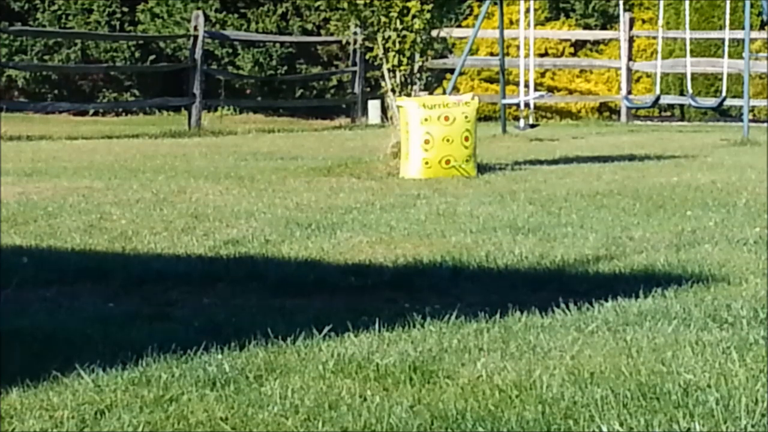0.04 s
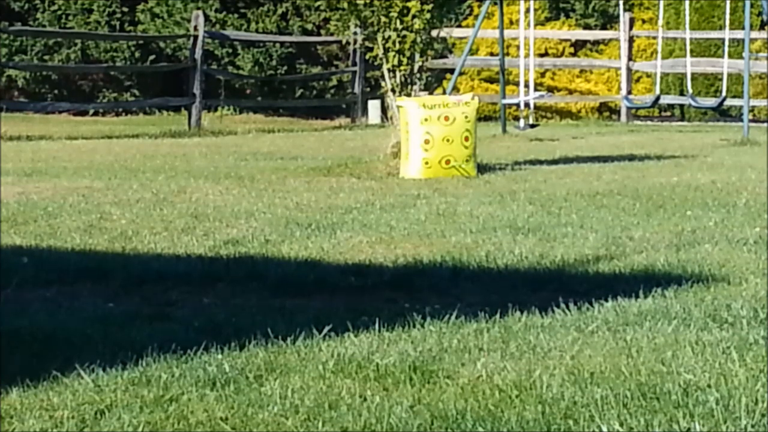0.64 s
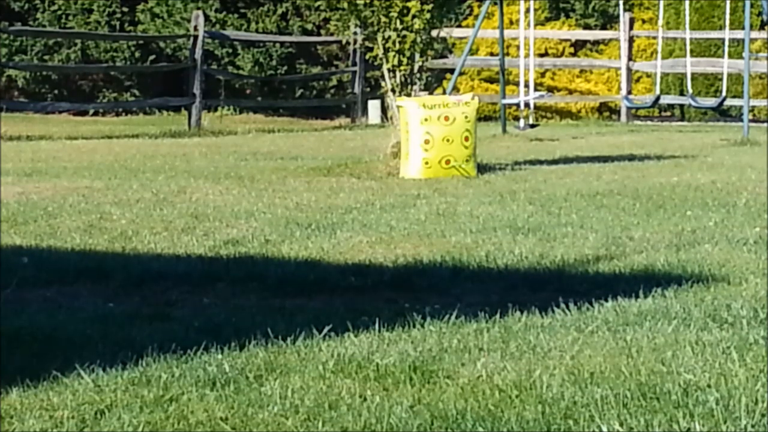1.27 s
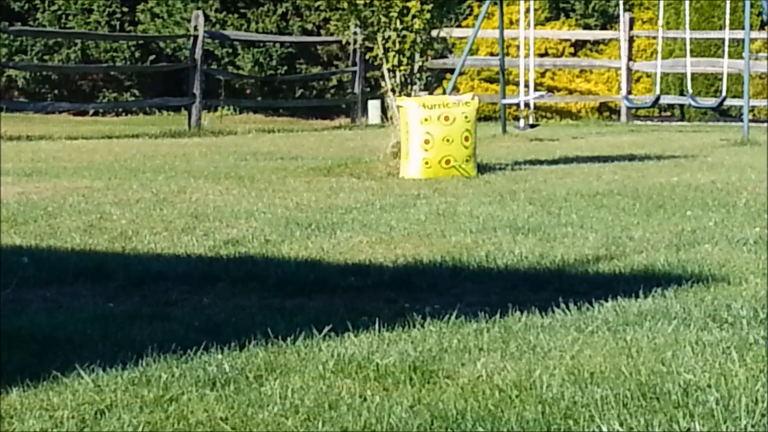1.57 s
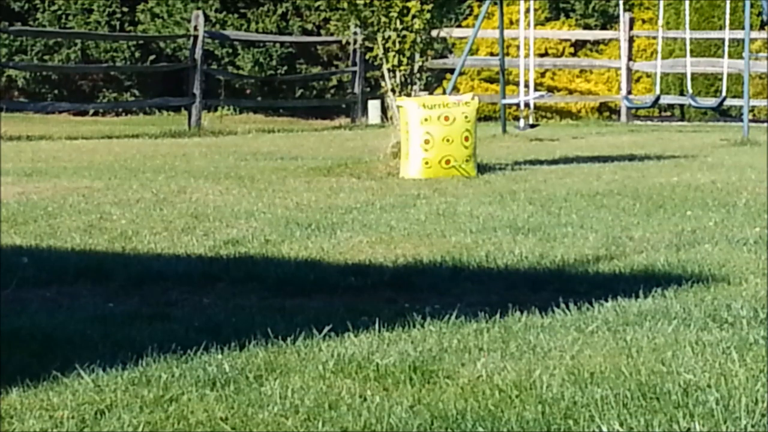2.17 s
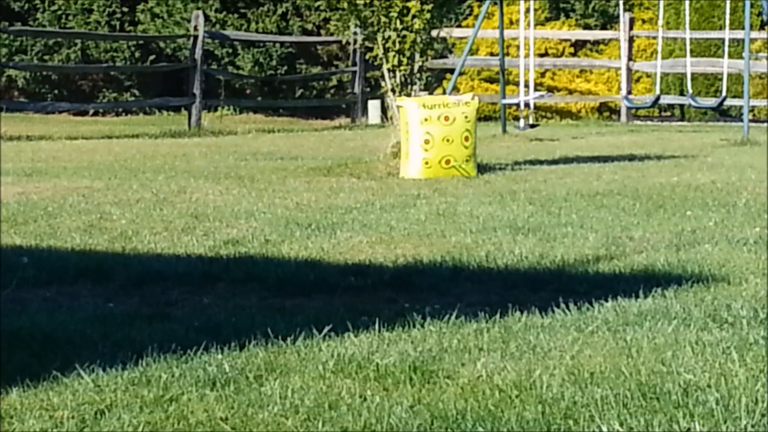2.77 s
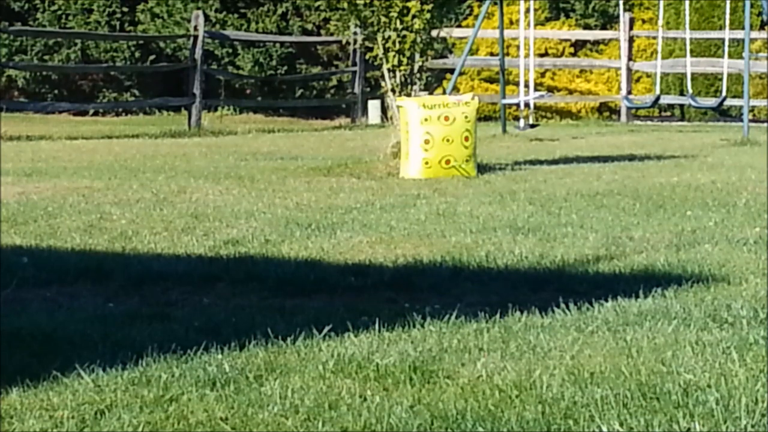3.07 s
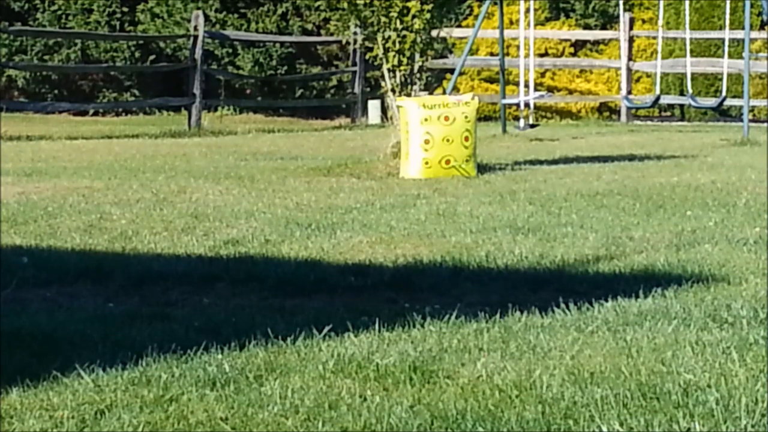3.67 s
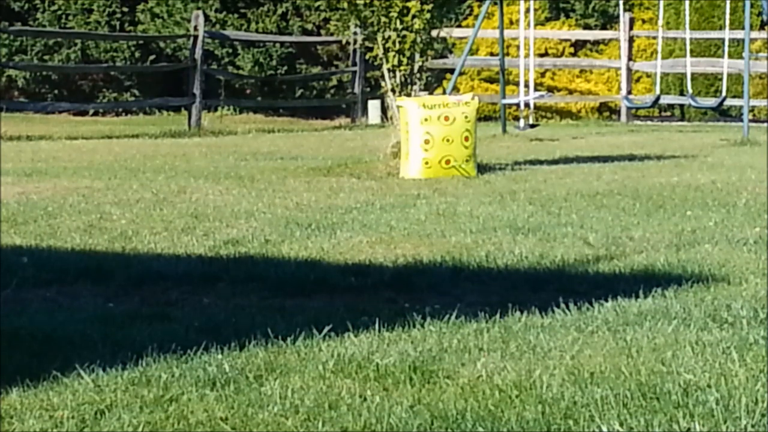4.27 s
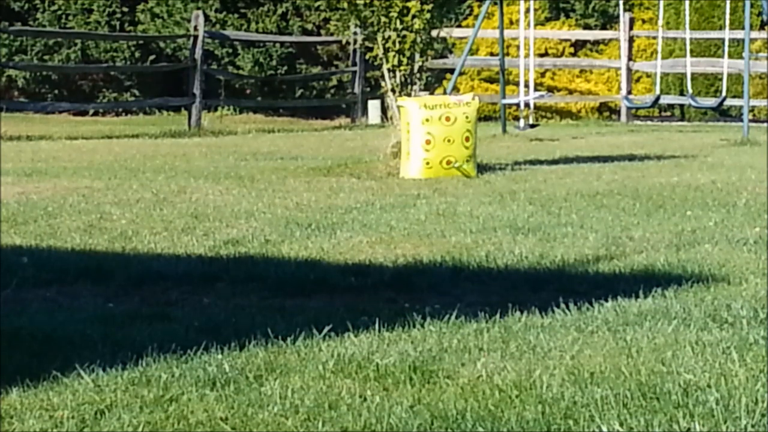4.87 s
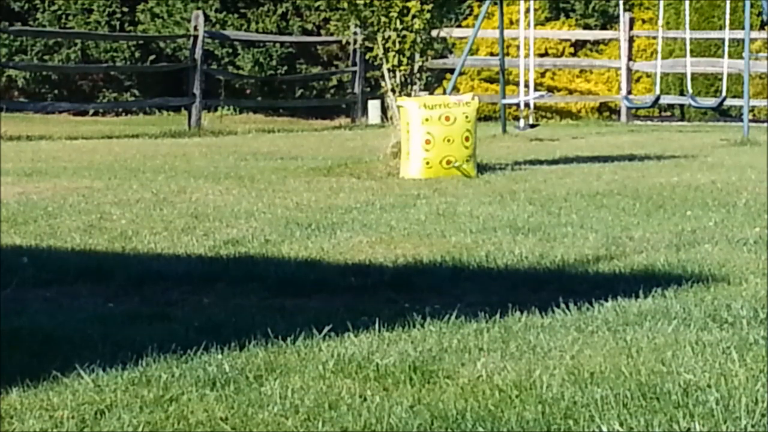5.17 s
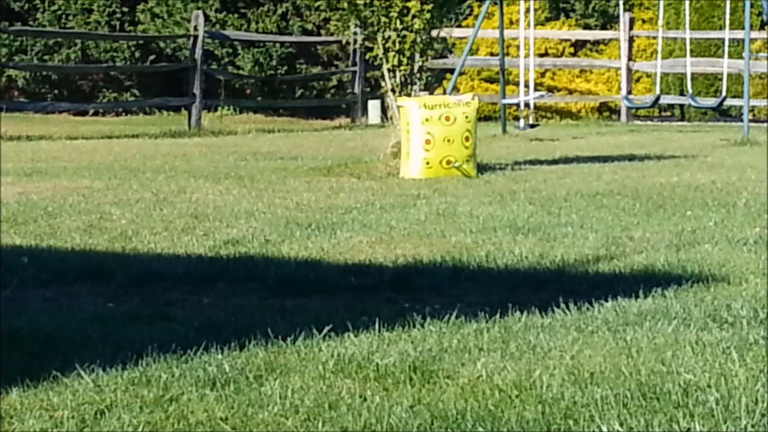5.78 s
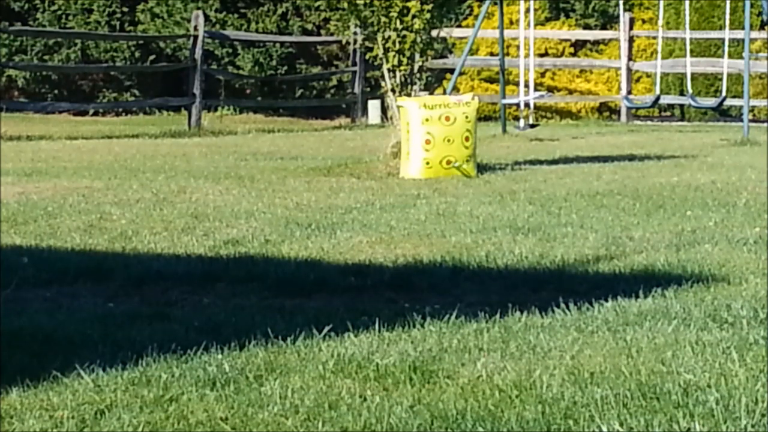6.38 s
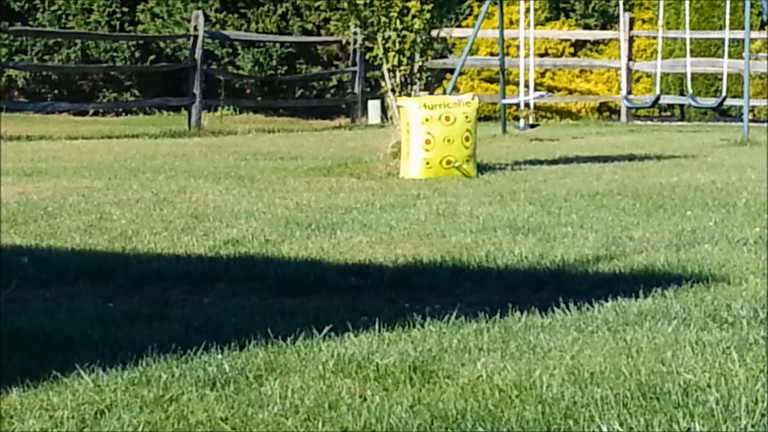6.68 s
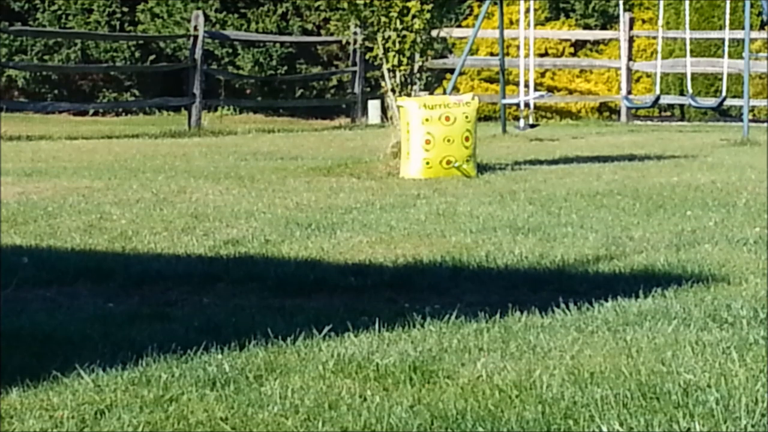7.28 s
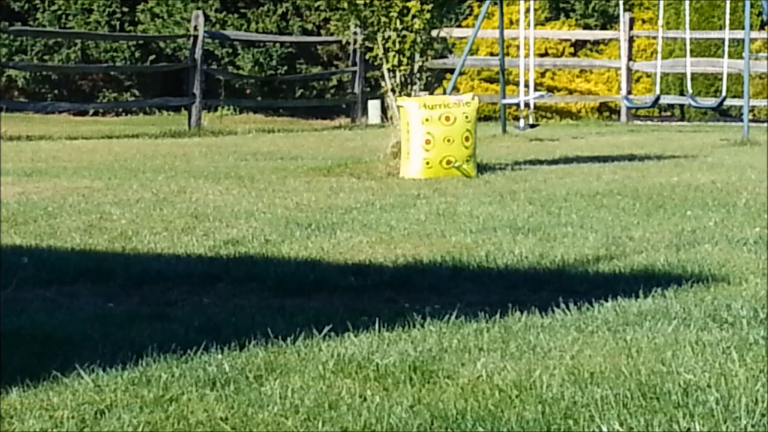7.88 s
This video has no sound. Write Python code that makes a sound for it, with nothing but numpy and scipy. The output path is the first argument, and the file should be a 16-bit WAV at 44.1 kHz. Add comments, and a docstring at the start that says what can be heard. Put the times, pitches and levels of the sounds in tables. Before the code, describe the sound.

A faint, high chorus of crickets trills throughout, swelling and dipping over a soft outdoor hiss and a very faint distant traffic rumble. Fingers lightly touch a crossbow in the first half second. From about 2.3 seconds, gusts buffet the microphone with low, uneven thumps. At 4.3 seconds the crossbow fires close by: one loud, sharp crack with a hollow thump and a brief metallic ring, slightly overloading the microphone. At 4.5 seconds the bolt hits a bag target straight ahead with a bright slap and a tiny rattle. Both sounds echo round the yard, fading within about half a second. The wind eases after 5 seconds. The bow gives a small click at 5.7 seconds and a soft, hollow knock at 5.9. From 6.3 seconds until the end, around 8 seconds, sleeves rustle faintly in short strokes, slightly to the right, as the crickets continue.

```python
"""Crickets trill all round a lawn while wind buffets the microphone. About four seconds in, a crossbow
fires: the latch lets go and the string slams home, loud enough to overload the microphone.
A fifth of a second later the bolt slaps into a bag target, and fence and house throw both sounds back.
Then the shooter lowers the bow with a knock and rustling sleeves."""
import sys
import numpy as np
from scipy import signal
from scipy.fft import rfft, irfft, next_fast_len
from scipy.io import wavfile
from scipy.ndimage import uniform_filter1d, map_coordinates

SR = 44100
rng = np.random.default_rng(int(sys.argv[2]) if len(sys.argv) > 2 else 0)


def dump_mix(stems):
    """Bounce the given channels to the path in sys.argv[1] as a 16-bit WAV at rate SR."""
    frames = np.atleast_2d(stems).T  # one column per channel
    limited = np.clip(frames, -1, 1)  # hard clip at full scale
    pcm = np.round(limited * 32767).astype(np.int16)
    wavfile.write(sys.argv[1], SR, pcm)


N = 358974
TIME = np.arange(N) / SR
# In the tables, fade_s is the time to fade by 60 dB and left_db is how much louder the left side is.

# The blows of the shot (latch, bolt on the rail, string stop, cams, rebound, rattle, echo off a wall):
# start_s, crack_db, boom_db, ring_db, rise_s, fade_s, left_db
SHOT_BLOWS = [(4.3186, -7.5, -22, -39.5, .0015, .022, 0.5), (4.3222, -19.5, -36, -44.5, .003, 0.038, -5.5),
              (4.327, -1.5, -2, -22.5, .002, 0.046, 1.5), (4.332, -1, -29.5, -27.5, 0.0037, 0.023, -1),
              (4.3491, -12, -17.5, -30, .001, .048, 0.5), (4.3702, -28.5, -31, -43, .001, 0.08, -3.5),
              (4.416, -27, -30, -48.5, 0.016, 0.035, 1)]
# Tone of a blow's sharp crack: pitch_hz, level_db
CRACK_TONE = [(700, -20), (1200, -6.5), (1700, -11), (2300, -7.5), (3100, -15), (4000, -6), (5100, -1),
              (6200, -4), (7600, 0.5), (9200, -13.5), (14500, -21)]
# Tone of the air pushed by the limbs, the bow's springy arms: pitch_hz, level_db
BOOM_TONE = [(60, -28), (200, -22), (300, 11), (430, 10.5), (760, -7), (900, -5.5), (1300, -12.5),
             (2000, -27.5)]
# Deep notes of the limbs: pitch_hz, level_db, fade_s
LIMB_NOTES = [(307, -13, 0.16), (407, -6.5, 0.039), (426, -4.5, 0.085), (449, -17.5, 0.1), (590, 0, 0.041),
              (642, -17.5, .12), (705, -6, 0.073), (788, -8, 0.056), (937, -12, .05), (1002, -11, 0.055),
              (1218, -7.5, .06)]
# High notes of the rail, cams and fittings: pitch_hz, level_db, fade_s
METAL_NOTES = [(1642, -2, 0.083), (2070, -8.5, 0.1), (2181, -11, .1), (2322, -8.5, 0.083),
               (2988, -8.5, 0.12), (4100, -16.5, .2), (4850, -9, 0.134), (5400, 4, 0.045),
               (5083, -7.5, .15), (5630, -3, 0.11), (6636, -1, .13), (7349, -3, .1), (7500, 2, 0.1292),
               (8300, -3, .12), (7815, -5, 0.1215), (11430, -14.5, .1)]


def crossbow():
    """Each blow cracks, pushes air with the limbs and leaves the metal ringing."""
    out = np.zeros((2, N))
    bass_cut = signal.butter(4, 290, "high", fs=SR, output="sos")  # thin limbs give off little bass
    for start_s, crack_db, boom_db, ring_db, rise_s, fade_s, left_db in SHOT_BLOWS:
        crack = amp(crack_db) * burst(CRACK_TONE, 0.18, rise_s, fade_s)
        limbs = signal.sosfilt(bass_cut, ringing(LIMB_NOTES, rise_s / 2, looseness=0))
        pushed_air = amp(-5.5) * burst(BOOM_TONE, 0.83, rise_s, fade_s)
        boom = amp(boom_db) * pan(3) * (limbs + pushed_air)
        metal = amp(ring_db) * ringing(METAL_NOTES, rise_s, looseness=1)
        add(out, start_s, pan(left_db) * (crack + boom + metal))
    return from_right(out)


# The bag gives, the shaft rattles, the fence echoes: start_s, rattle_db, thud_db, rise_s, fade_s, left_db
BAG_KNOCKS = [(4.5138, -5, -25.5, 0.00014, 0.0042, 0), (4.519, -50, -30, 0.00075, 0.032, -4),
              (4.528, -35, -38, .0005, 0.034, 3), (4.5332, -14, -39, 0.00045, 0.011, 11.5),
              (4.5425, -16, -29, 0.0018, 0.028, 4.5), (4.556, -27.5, -53, 0.008, 0.061, 0),
              (4.5945, -20, -41, 0.0016, 0.044, 3.5)]
# Bright tone of the bag's tight cloth: pitch_hz, level_db
CLOTH_TONE = [(150, -15), (450, -10), (900, -9.5), (1900, -2.5), (4000, 1), (5000, 7.5), (6300, -0.5),
              (7400, 3.5), (8300, -7.5), (10200, -30), (14500, -34)]
# Dull tone of the bag's filling: pitch_hz, level_db
FILLING_TONE = [(40, -26), (120, -1), (250, 2.5), (420, -1), (650, -24), (1200, -24)]


def target():
    """The bolt's point slaps the tight bag straight ahead, then the bag and the shaft settle."""
    slap_s, slap_db, size = 4.5126, 0.3, 2048
    cloth = tone_gain(CLOTH_TONE, np.fft.rfftfreq(size, 1 / SR))
    # Pack the cloth's whole tone into one pulse that starts at once (a minimum-phase pulse).
    cepstrum = irfft(np.log(cloth + 1e-4))
    slap = irfft(np.exp(rfft(2 * cepstrum[:size // 2], size)))
    out = knocks(BAG_KNOCKS, CLOTH_TONE, FILLING_TONE)
    add(out, slap_s, amp(slap_db) * slap / np.abs(slap).max())
    return out


# How long sound lingers among nearby surfaces: pitch_hz, fade_s
NEAR_FADES = [(150, .25), (600, 0.069), (2000, 0.28), (7000, 0.17), (12000, .14)]
# How long it lingers across the whole yard: pitch_hz, fade_s
YARD_FADES = [(150, 1.3), (600, 0.2), (2000, 1.6), (5500, 1.4), (8000, 0.58), (12000, 0.34)]


def reflections(sound, fades, build_s, reach_s):
    """Many small echoes build up, fade at each pitch's own speed and stop where the yard ends."""
    hz, t, bands = signal.stft(rng.standard_normal((2, SR)), SR, nperseg=256)
    fading = amp(-60 * t / value_at(fades, hz)[:, None])
    walls = (1 - np.exp(-t / build_s)) / (1 + (t / reach_s) ** 8)
    tail = signal.istft(bands * fading * walls, SR, nperseg=256)[1]
    return signal.fftconvolve(sound, tail / np.linalg.norm(tail[0]), axes=1)[:, :N]


# Echoes off hedges and houses farther away: start_s, level_db, pitch_hz, rise_s, fade_s
FAR_ECHOES = [(4.625, -41, 930, 0.0061, 0.11), (4.665, -42, 1480, 0.014, 0.22),
              (4.793, -49, 2390, 0.016, 0.23), (4.835, -47, 2760, 0.0053, 0.086)]


def echoes():
    """Each far surface returns the shot as a smear, played here as a burst of noise around one pitch."""
    out = np.zeros((2, N))
    for start_s, level_db, hz, rise_s, fade_s in FAR_ECHOES:
        band = [(hz / 2, -18), (hz, 0), (hz * 2, -18)]
        add(out, start_s, amp(level_db) * burst(band, 0.28, rise_s, fade_s))
    return out


# Fingers touching the bow: start_s, click_db, bump_db, rise_s, fade_s, left_db
FINGER_KNOCKS = [(.18, -53, -80, 0.02, 0.08, 4), (.305, -77, -52, 0.013, .1, 1),
                 (.365, -51.5, -69, 0.03, 0.18, 3), (5.6915, -43, -55, 0.00071, 0.18, 0.5),
                 (5.886, -47.5, -38, 0.0025, 0.13, 4.5), (5.908, -58, -40, 0.0018, 0.089, 0)]
# Tone of a finger's bright click: pitch_hz, level_db
CLICK_TONE = [(300, -10), (900, -3), (2000, -6.5), (4200, 2), (7000, 2), (12000, -30)]
# Tone of the dull bump under it: pitch_hz, level_db
BUMP_TONE = [(30, -9), (90, -7), (170, -6.5), (235, -2.5), (320, -9), (450, -14), (800, -16.5), (1100, -25),
             (1900, -17), (4000, -61)]
# Notes of a loose fitting: pitch_hz, level_db, fade_s
FITTING_NOTES = [(2860, -5, .05), (3900, 1, 0.045), (4370, 2, .05)]
# Notes of the stock, the bow's hollow body: pitch_hz, level_db, fade_s
STOCK_NOTES = [(166, -13, 0.069), (247, -1, 0.2), (430, -7, 0.055)]


def handling():
    """Fingers knock on the bow, a fitting ticks as the grip shifts, and a bump rings the stock."""
    tick_s, bump_s = 5.692, 5.888
    out = knocks(FINGER_KNOCKS, CLICK_TONE, BUMP_TONE)
    add(out, tick_s, amp(-44.5) * ringing(FITTING_NOTES, rise_s=0.001, looseness=0.5))
    add(out, bump_s, amp(-37) * ringing(STOCK_NOTES, rise_s=0.0021, looseness=0))
    return from_right(out)


# Strokes of the sleeves: middle_s, length_s, swish_db, scuff_db
SLEEVE_STROKES = [(6.335, .12, -65.5, -65.5), (6.473, 0.096, -58, -56.5), (6.589, 0.056, -62, -60.5),
                  (6.743, 0.065, -56, -62.5), (6.803, 0.042, -53.5, -62), (7.07, 0.26, -66, -71),
                  (7.37, 0.14, -51.5, -57.5), (7.465, 0.06, -52, -60), (7.538, 0.1, -57, -59.5),
                  (7.754, 0.16, -60.5, -60), (8.01, 0.045, -64, -65), (8.118, 0.06, -57, -66.5)]
# Tone of the fabric's high swish: pitch_hz, level_db
SWISH_TONE = [(3000, -61), (4500, -3.5), (6500, 3.5), (7600, 4), (9500, -5), (14500, -11)]
# Tone of its lower scuff: pitch_hz, level_db
SCUFF_TONE = [(300, -3), (900, -2.5), (1900, 2.5), (3000, 0), (4400, 6.5), (6000, -49)]


def sleeves():
    """Fabric slides on fabric in short strokes, catching in fine grains."""
    swish_level = sum(amp(db) * swell_at(s, length_s) for s, length_s, db, _ in SLEEVE_STROKES)
    scuff_level = sum(amp(db) * swell_at(s, length_s) for s, length_s, _, db in SLEEVE_STROKES)
    swish = swish_level * pan(-14) * noise(SWISH_TONE, alike=0.14)
    scuff = scuff_level * pan(-0.12) * noise(SCUFF_TONE, alike=0.34)
    grains = amp(2 * wobble(300))
    return grains * from_right(swish + scuff)


# Eddies, small swirls of air that hit the microphone: middle_s, level_db, pitch_hz, left_db
EDDIES = [(1.635, -50.5, 99, 2), (2.357, -35, 89, 0), (2.446, -34.5, 85, 9), (2.572, -38, 90, 5),
          (2.675, -46, 97, 23), (2.776, -44.5, 103, 24), (2.938, -40.5, 90, 9), (3.142, -35.5, 84, 10),
          (3.277, -42, 100, 10), (3.472, -32.5, 117, 14), (3.675, -40.5, 111, 14), (3.88, -36.5, 93.5, 0),
          (3.977, -32, 79, 10), (4.063, -35, 80, -7), (4.151, -39, 90, 18), (4.745, -33, 120, -14),
          (4.819, -38, 95, 2), (5.09, -51.5, 95, 0), (5.31, -43.5, 95.4, 0.5), (5.566, -36, 94.8, -7),
          (6.06, -45, 95, 6), (6.318, -47.5, 90, 10)]


def wind_thumps():
    """A passing eddy pushes and pulls the microphone's membrane once or twice."""
    out = np.zeros((2, N))
    t = TIME[:SR // 10] - 1 / 20  # a tenth of a second, centred on the eddy
    for middle_s, level_db, hz, left_db in EDDIES:
        cycles = hz * t + rng.random() + 0.23 * rng.random((2, 1))
        push = np.exp(-(t * hz / 0.71) ** 2) * np.sin(2 * np.pi * cycles)
        add(out, middle_s + t[0], amp(level_db - 0.5) * pan(left_db) * push)
    return out


# Strength of the breeze: time_s, level_db
BREEZE_LEVELS = [(0, -76), (1.1, -74), (1.75, -59), (2.3, -67), (2.45, -52.5), (3.2, -53.5), (3.36, -62),
                 (3.8, -65), (4.1, -53), (4.45, -44.5), (4.81, -44.5), (4.87, -63.5), (5.15, -70),
                 (5.45, -68), (6.1, -68.5), (8.14, -64.5)]
# Which side of the microphone the breeze strikes: time_s, left_db
BREEZE_SIDES = [(0, -8), (2.3, 1), (2.8, 4), (3.25, 10), (4.1, 6), (4.65, 7), (5.0, -2), (8.1, -1)]
# Tone of the buffeting: pitch_hz, level_db
BUFFET_TONE = [(20, -20), (45, -6), (80, -0.5), (140, -3), (220, -14), (400, -25.5), (1000, -31.5),
               (3000, -59.5)]


def wind():
    """The breeze buffets the microphone's openings; each eddy adds a duller puff of churning air."""
    calm_db, swing, puff_top_hz = -65, 1.267, 536  # the buffeting swings wider than the breeze
    buffet_db = calm_db - 3 + swing * (curve(BREEZE_LEVELS) - calm_db) + 2.4 * wobble(22)
    left_db = curve(BREEZE_SIDES)
    steady = amp(buffet_db + np.array([left_db, -left_db]) / 2)
    puff_power = 0
    for middle_s, level_db, _, eddy_left_db in EDDIES:
        length_s = np.where(TIME < middle_s, 0.03, 0.074)  # arrives fast, leaves slowly
        puff_power += (amp(level_db - 9) * pan(0.63 * eddy_left_db) * swell_at(middle_s, length_s)) ** 2
    churn = noise(BUFFET_TONE, alike=0.2008)
    churn_power = np.abs(uniform_filter1d(churn.mean(0) ** 2, size=SR // 25))
    churn /= np.sqrt(churn_power + 0.036)  # evened out, so that each gust sets the level
    deep = filtered(churn, lambda hz: 1 / (1 + (hz / puff_top_hz) ** 2))
    return amp(-1) * (np.sqrt(steady ** 2 + puff_power) * deep + steady * (churn - deep))


# Loudness of the far cricket chorus: time_s, level_db
CHORUS_LEVELS = [(0.04, -54), (0.16, -56.5), (1.54, -54.5), (1.62, -63), (1.78, -50.5), (2.0, -64),
                 (2.12, -54), (2.38, -62), (2.52, -49.5), (2.74, -61), (2.78, -55), (3.68, -58),
                 (3.74, -69.5), (3.86, -53), (4.22, -63.0), (4.86, -51), (5.0, -63.5), (5.2, -54.5),
                 (5.58, -67), (5.72, -53.5), (5.9, -54), (6.0, -74), (6.12, -54), (6.2, -63), (6.38, -51),
                 (6.5, -59.0), (7.84, -54.5), (7.9, -60.5), (8.0, -54.5), (8.08, -54)]
# Tone of the chorus: pitch_hz, level_db
CHORUS_TONE = [(3600, -27.5), (4300, -17), (4650, -15), (4980, -18.5), (5250, -2.5), (5500, 1),
               (5750, -2.5), (6100, -9), (6600, -19.5), (7900, -24), (9500, -26)]
# Single crickets nearby: pitch_hz, width_hz, level_db, chirps_per_s, offset_s, left_db
NEAR_CRICKETS = [(6830, 80, -73, 3.36, .28, -11), (5150, 90, -72.5, 1.8, 0.37, 10),
                 (5560, 83, -67.5, 1.2, 0.37, 9.5)]
# Lower crickets that trill in short spells: middle_s, length_s, pitch_hz
LOW_TRILLS = [(.55, 0.37, 4430), (1.207, 0.14, 4650), (1.6, 0.28, 4640), (1.948, 0.18, 4620),
              (2.254, 0.18, 4620), (2.71, 0.26, 4600), (3.123, 0.096, 4640), (3.705, .35, 4390),
              (3.947, 0.15, 4700), (5.082, 0.11, 4640), (5.507, 0.31, 4663)]


def crickets():
    """A far chorus swells and flutters with wing strokes; other crickets call on their own notes."""
    swell = amp(curve(CHORUS_LEVELS) + 1.5 + 1.47 * wobble(9.7))
    flutter = amp(2 * wobble(90))
    out = swell * flutter * pan(6.3) * from_right(noise(CHORUS_TONE, alike=0.094))
    for hz, width_hz, level_db, chirps_per_s, offset_s, left_db in NEAR_CRICKETS:
        chirps = np.cos(np.pi * (chirps_per_s * (TIME - offset_s) + 0.12 * wobble(1.5))) ** 2
        drift = amp(1.5 * wobble(2.7))
        out += amp(level_db) * pan(left_db) * unit(chirps * drift * wing_note(hz, width_hz))
    for middle_s, length_s, hz in LOW_TRILLS:
        spell = swell_at(middle_s, length_s, steepness=6)
        out += amp(-67.5) * pan(7) * spell * wing_note(hz, width_hz=170)
    return out


def wing_note(pitch_hz, width_hz):
    """The slightly unsteady note of a cricket's wing: a narrow band of noise."""
    hiss = rng.standard_normal((2, N))
    return unit(filtered(hiss, lambda hz: 1 / (1 + (2 * (hz - pitch_hz) / width_hz) ** 2)))


# Tone of the faint outdoor hiss: pitch_hz, level_db
HISS_TONE = [(25, -20), (60, -6.5), (100, -8.5), (200, -9), (400, -15.5), (1000, -16), (2300, -16.5),
             (3400, -21.5), (7000, -16), (10000, -22), (14500, -20)]
# Tone of distant traffic: pitch_hz, level_db
TRAFFIC_TONE = [(50, -14.5), (75, -5), (100, 4), (135, -10), (200, -10), (350, -16)]


def air():
    """A faint hiss swells a little with the cricket chorus, over the rumble of distant traffic."""
    chorus_db = curve(CHORUS_LEVELS)
    hiss_db = -61 + 0.24 * (chorus_db - chorus_db.mean())
    hiss = amp(hiss_db) * pan(5.7) * from_right(noise(HISS_TONE, alike=0.16))
    return hiss + amp(-67) * noise(TRAFFIC_TONE, alike=0.95)


def knocks(rows, bright_tone, dull_tone):
    """Each contact makes a bright surface noise over a dull body that lasts a little longer."""
    out = np.zeros((2, N))
    for start_s, bright_db, dull_db, rise_s, fade_s, left_db in rows:
        body = amp(dull_db) * burst(dull_tone, 0.91, rise_s, fade_s + 0.024)
        surface = amp(bright_db) * burst(bright_tone, 0.036, rise_s, fade_s)
        add(out, start_s, pan(left_db) * (surface + body))
    return out


def ringing(notes, rise_s, looseness):
    """A struck part's notes fade, neighbours swinging opposite ways; looseness (0-1) upsets that order."""
    t = TIME[:SR // 2]
    hz, level_db, fade_s = np.transpose(notes)[:, :, None]
    phase = np.pi * (np.arange(len(hz))[:, None] + 2 * looseness * rng.random((2, *hz.shape)))
    waves = amp(level_db - 60 * t / fade_s) * np.sin(2 * np.pi * hz * t + phase)
    return waves.sum(1) * np.minimum(t / rise_s, 1)


def burst(tone, alike, rise_s, fade_s):
    """Noise that rises to a strength of 1 and dies away."""
    t = TIME[:SR // 2]
    shape = np.minimum(t / rise_s, 1) * amp(-60 * np.maximum(t - rise_s, 0) / fade_s)
    return unit(shape * noise(tone, alike, size=len(t))) * np.sqrt(np.mean(shape ** 2))


def noise(tone, alike, size=N):
    """Stereo noise with the given tone; alike runs from 0 (unrelated sides) to 1 (the same on both)."""
    middle, side = filtered(rng.standard_normal((2, size)), lambda hz: tone_gain(tone, hz))
    spread = np.arccos(alike) / 2
    return unit(np.cos(spread) * middle + np.sin(spread) * np.array([side, -side]))


def tone_gain(tone, hz):
    """The gain a tone table gives each pitch, falling away beyond the table's ends."""
    high_cut = 1 + (hz / (1.3 * tone[-1][0])) ** 8
    low_cut = 1 + (0.7 * tone[0][0] / (hz + 1)) ** 8
    return amp(value_at(tone, hz)) / np.sqrt(high_cut * low_cut)


def value_at(rows, hz):
    """Read between the rows of a (pitch_hz, value) table, with octaves evenly spaced."""
    pitches, values = np.transpose(rows)
    return np.interp(np.log(hz + 1), np.log(pitches + 1), values)


def curve(rows):
    """Join the rows of a (time_s, value) table with straight lines."""
    return np.interp(TIME, *np.transpose(rows))


def swell_at(middle_s, length_s, steepness=4):
    """A smooth rise and fall that stays above half height for length_s."""
    return 1 / (1 + (2 * np.abs(TIME - middle_s) / length_s) ** steepness)


def wobble(per_s):
    """A smooth curve through per_s random values a second."""
    return map_coordinates(rng.standard_normal(int(N * per_s / SR) + 4), [TIME * per_s])


def filtered(sound, gain_at):
    """Scale each pitch in the sound by gain_at(hz)."""
    length = sound.shape[-1]
    padded = next_fast_len(length + 8192)
    gains = gain_at(np.fft.rfftfreq(padded, 1 / SR))
    return irfft(rfft(sound, padded) * gains, padded)[..., :length]


def from_right(sound, lag_s=0.0002994):
    """Sound from the right reaches the microphone's left side a moment later."""
    return filtered(sound, lambda hz: np.exp(np.pi * 1j * hz * lag_s * np.array([[-1], [1]])))


def pan(left_db):
    """Left and right gains that differ by left_db."""
    return amp([[left_db / 2], [-left_db / 2]])


def amp(db):
    """Turn decibels into a gain."""
    return 10 ** (np.asarray(db) / 20)


def unit(sound):
    """Scale to an average strength (rms) of 1."""
    return sound / np.sqrt(np.mean(sound ** 2) + 1e-20)


def add(out, start_s, sound):
    """Mix a sound into out, beginning at start_s."""
    part = out[:, round(start_s * SR):][:, :sound.shape[-1]]
    part += sound[..., :part.shape[1]]


def scene():
    """The shot and the hit echo round the yard, over the shooter's movements and the outdoor sounds."""
    shot_and_hit = crossbow() + target()
    near = amp(-15) * reflections(shot_and_hit, NEAR_FADES, build_s=0.014, reach_s=0.3)
    far = amp(-28) * pan(3) * reflections(shot_and_hit, YARD_FADES, build_s=0.46, reach_s=0.38)
    outdoors = wind() + wind_thumps() + crickets() + air()
    return shot_and_hit + near + far + echoes() + handling() + sleeves() + outdoors


def record(dry):
    """The microphone overloads, flattening the loudest peaks, and the highest treble is cut off."""
    top_hz = 14600
    flattened = dry / (1 + np.abs(dry) ** 6) ** (1 / 6)
    return filtered(flattened, lambda hz: 1 / (1 + (hz / top_hz) ** 120))


dry = scene()
out = record(dry)
dump_mix(out)
```